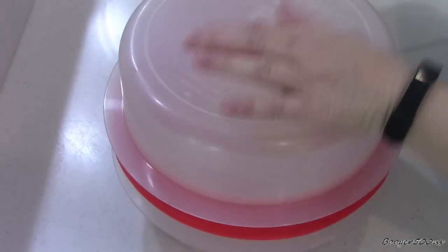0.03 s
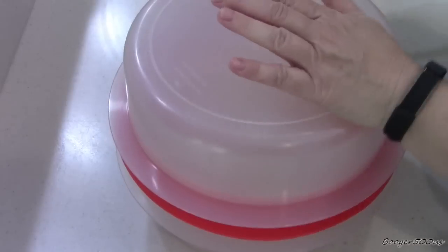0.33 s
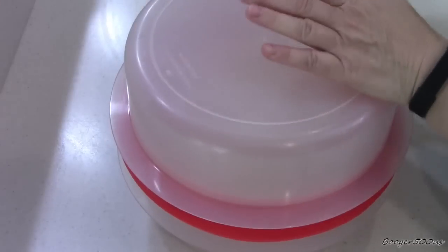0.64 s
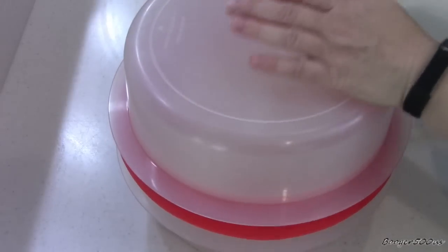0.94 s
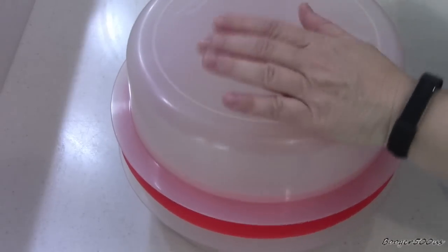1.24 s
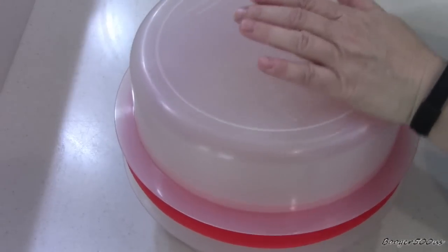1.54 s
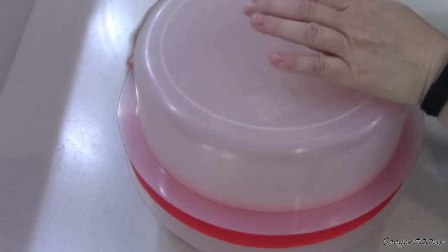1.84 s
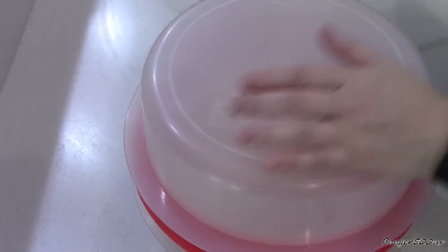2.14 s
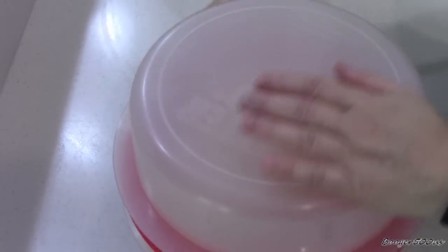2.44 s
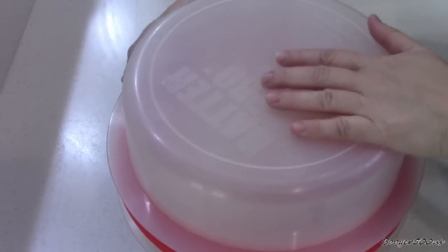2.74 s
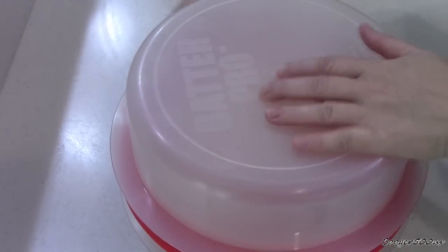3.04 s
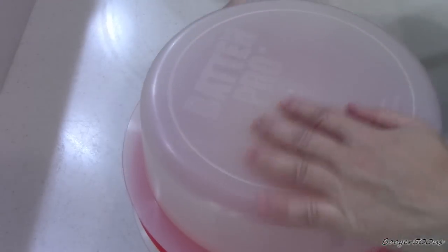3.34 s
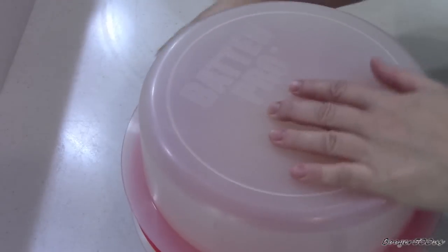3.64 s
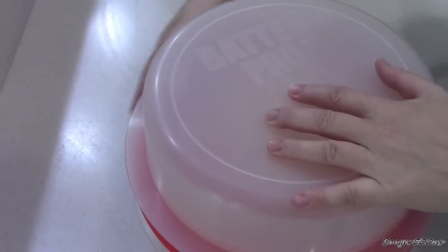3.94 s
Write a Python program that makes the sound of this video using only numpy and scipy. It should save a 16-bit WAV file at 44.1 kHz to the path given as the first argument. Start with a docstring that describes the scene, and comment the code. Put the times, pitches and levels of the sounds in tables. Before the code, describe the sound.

Close up in a small kitchen, dry grains swish in a steady rhythm inside a lidded plastic tub sliding to and fro. Between strokes it thumps on the counter and sometimes clacks, over a low hum.

```python
"""On a kitchen counter, a plastic tub is pushed to and fro, heard up close and in mono.
Its base scrapes and its dry contents swish along the wall with every stroke. At the turns the tub
rocks and knocks, its lid booms, and now and then the rim clacks.
The echo of a small room and a low hum lie behind."""
import sys
import numpy as np
from scipy import signal
from scipy.fft import rfft, irfft
from scipy.io import wavfile
from scipy.ndimage import map_coordinates

SR = 44100
rng = np.random.default_rng(int(sys.argv[2]) if len(sys.argv) > 2 else 0)


def generate_wav(signal):
    """Clip the signal to [-1, 1] and save it as 16-bit WAV at the path in sys.argv[1]."""
    frames = np.transpose(np.atleast_2d(signal))
    scaled = np.clip(frames, -1, 1) * 32767
    pcm = np.round(scaled).astype(np.int16)
    wavfile.write(sys.argv[1], SR, pcm)


N = 176400
T = np.arange(N) / SR  # time in the scene, in seconds
HIT_T = np.arange(SR // 2) / SR  # time since a hit, in seconds


def amp(db):
    """Turns decibels into a number to multiply a sound by."""
    return 10 ** (np.asarray(db) / 20)


def unit(x):
    """Scales a signal to an average power of one."""
    return x / np.sqrt(np.mean(x ** 2) + 1e-20)


def add(mix, start_s, sound):
    """Mixes a sound in at the given time."""
    part = mix[max(round(start_s * SR), 0):][:len(sound)]
    part += sound[:len(part)]


def colour(x, points):
    """Turns frequencies up or down along a curve of points: f/Hz, level/dB."""
    hz, db = np.transpose(points)
    f = np.fft.rfftfreq(len(x), 1 / SR)
    return irfft(rfft(x) * amp(np.interp(np.log(f + 1), np.log(hz), db)), len(x))


def wobble(hz):
    """A random wavering, mostly slower than the given rate."""
    f = np.fft.rfftfreq(N, 1 / SR)
    return unit(irfft(rfft(rng.standard_normal(N)) / (1 + (f / hz) ** 2), N))


def fade(t60):
    """Dies away by 60 dB in t60 seconds."""
    return np.exp(-np.log(1000) * HIT_T / t60)


def hit_shape(t60, attack_s):
    """The strength of a hit: it rises quickly, then dies away."""
    return fade(t60) * (1 - np.exp(-HIT_T / attack_s))


def tone(hz, t60, attack_s):
    """One dying vibration of something struck."""
    return np.sin(2 * np.pi * hz * HIT_T) * hit_shape(t60, attack_s)


def grains(per_second=14000, spread_db=0.5):
    """A dense stream of tiny contacts of uneven size."""
    size = amp(spread_db * np.minimum(rng.exponential(1, N), 5))
    return size * rng.standard_normal(N) * (rng.random(N) < per_second / SR)


def background(noise_db=-32, hum_hz=59.3, hum_db=-40.5):
    """Low room rumble, faint hiss and the hum of mains power."""
    # tone colour of the rumble and hiss: f/Hz, level/dB
    noise_colour = [(15, 5), (30, -3), (62, 0), (150, -10), (250, -18), (600, -22), (1200, -31),
                    (2000, -32.5), (5000, -35.5), (9000, -42.5), (16000, -55)]
    noise = unit(colour(rng.standard_normal(N), noise_colour))
    hum = np.sqrt(2) * np.sin(2 * np.pi * hum_hz * T)
    return amp(noise_db) * noise + amp(hum_db) * hum


def scrape(rise_s=0.018, brake_s=0.15, judder_db=1.75):
    """The tub's base skids: each push starts quickly, keeps its speed and brakes to a stop."""
    # pushes across the counter: start/s, stop/s, level/dB
    pushes = [(-.2, 0.167, -33), (0.184, 0.558, -33), (0.58, 0.982, -32.5), (1.03, 1.406, -32.5),
              (1.441, 1.864, -34.5), (1.872, 2.257, -32), (2.308, 2.745, -30), (2.747, 3.129, -32),
              (3.165, 3.524, -31), (3.577, 3.988, -32.5)]
    # dull tone colour of the base rubbing on the counter: f/Hz, level/dB
    scrape_colour = [(100, 12), (330, -1.5), (620, -2.5), (850, 2.5), (1000, 9), (1150, 3), (1320, 4.5),
                     (1650, 0.5), (1950, 1.5), (2600, -2.5), (3300, 2), (3900, -13), (5300, -8.5),
                     (7000, -20), (16000, -36)]
    level = np.zeros(N)
    for start, stop, db in pushes:
        starting = np.clip((T - start) / rise_s, 0, 1)
        braking = np.clip((stop - T) / brake_s, 0, 1) ** 1.51
        level += amp(db) * starting * braking
    return level * unit(colour(grains(), scrape_colour)) * amp(judder_db * wobble(hz=35))


def contents(trickle_db=-9.5, settle_s=0.049, flutter_db=0.33):
    """Grains slide on the wall: a ringing swish with fizz on top, then a thin trickle as they settle."""
    # long slides and short jolts: fastest moment/s, rise/s, fall/s, level/dB, fizz against level/dB
    slides = [(.005, .05, .064, -29, -5.5), (0.227, 0.012, 0.012, -33.5, -6.5),
              (.403, 0.074, 0.052, -27.5, -6), (0.616, 0.022, 0.01, -33, -7), (0.807, 0.1, .071, -25, -6),
              (1.244, 0.12, 0.058, -25.5, -5.5), (1.485, .02, 0.044, -36.5, -5),
              (1.69, 0.13, 0.034, -27, -6.5), (1.915, 0.02, 0.14, -37, -3), (2.109, 0.13, 0.056, -25, -4.5),
              (2.351, 0.017, .057, -34, -2), (2.507, .11, 0.097, -22.5, -7), (2.94, 0.11, 0.078, -25, -5),
              (3.342, 0.089, 0.099, -22.5, -5), (3.748, 0.071, 0.077, -25.5, -7),
              (3.83, 0.036, 0.036, -27, -6)]
    # tone colours of the sliding grains, their bright fizz and their trickle: f/Hz, level/dB
    swish_colour = [(500, -31.5), (1500, -20), (2000, -7.5), (2750, -7), (3100, 1.5), (3350, 1.5),
                    (3750, -9), (4500, -9.5), (5050, -4.5), (5350, 3), (5750, 1.5), (6300, -4),
                    (7000, -33.5), (16000, -50)]
    fizz_colour = [(3000, -37), (5500, -8.5), (6900, -1.5), (8200, -0.5), (9700, -4), (11200, -13),
                   (12500, -11), (14000, -16), (16000, -25)]
    trickle_colour = [(2500, -7), (3300, 3), (4800, 3), (7500, -8), (16000, -27.5)]
    swish_power, fizz_power = np.zeros((2, N))
    for t, rise, fall, db, fizz_db in slides:
        from_peak = abs(T - t) / np.where(T < t, rise, fall)
        power = (amp(db) * np.exp(-(from_peak / 1.043) ** 2.64)) ** 2  # a round-topped swell
        swish_power += power
        fizz_power += power * amp(fizz_db) ** 2
    lag = np.exp(-1 / (settle_s * SR))  # the trickle trails behind the swish
    trickle_power = amp(trickle_db) ** 2 * signal.lfilter([1 - lag], [1, -lag], swish_power)
    # the swish's pitches wander by about 1.2 % as the heap shifts
    position = np.arange(N) + np.cumsum(0.012 * wobble(hz=5))
    wandering = map_coordinates(colour(grains(), swish_colour), [position], mode="mirror")
    swish = np.sqrt(swish_power) * unit(wandering)
    fizz = np.sqrt(fizz_power) * unit(colour(grains(), fizz_colour))
    trickle = np.sqrt(trickle_power) * unit(colour(grains(), trickle_colour))
    return (swish + fizz + trickle) * amp(flutter_db * wobble(hz=43.7))


def bumps():
    """The rocking tub heaves on the counter with a deep note, its lid booms and its wall thuds."""
    # bumps of the tub: t/s, heave/dB, boom/dB, boom f/Hz, boom fade time/s
    bump_times = [(0.187, 5, -10.5, 107.4, 0.29), (0.22, 0, -0.5, 153, 0.068), (0.261, 0.5, -14, 153, 0.25),
                  (.31, -19, -13, 146, 0.14), (.596, -4, -18.5, 152, 0.37), (.651, -7, -12, 148.8, 0.26),
                  (1.021, -7.5, -12.5, 135, 0.088), (1.047, -8.5, -6.5, 147.6, 0.14),
                  (1.093, -4.5, -7.5, 144, 0.23), (1.264, -38, -21, 147.3, 0.46),
                  (1.439, -9.5, -15.5, 150, 0.067), (1.47, -4, -8, 140, 0.084),
                  (1.523, -10, -15.5, 149, 0.35), (1.577, -8.5, -10.5, 138, 0.095),
                  (1.73, -13, -18.5, 151.4, 0.27), (1.865, -10, -16.5, 155.5, .19),
                  (1.899, -2, -9, 142.5, 0.21), (2.335, -6, -15, 153, 0.24), (2.57, -10, -7.5, 146.5, 0.23),
                  (2.774, -6.5, -13, 169.5, 0.12), (3.014, -17, -10.5, 128, 0.051),
                  (3.094, -13, 3.5, 126, 0.029), (3.114, -4, -4, 132, 0.08),
                  (3.201, -7.5, -15.5, 171, 0.073), (3.528, -0.5, 4, 177, 0.056),
                  (3.553, 4, -14.5, 130, 0.069), (3.818, -23, -12.5, 142.3, 0.095)]
    out = np.zeros(N)
    for t, heave_db, boom_db, hz, t60 in bump_times:
        heave = amp(heave_db) * tone(hz=64.1, t60=0.092, attack_s=0.0081)
        boom = amp(boom_db) * tone(hz, t60, attack_s=0.0019)
        # the wall gives no more under the heaviest bumps, so the thud has a top level
        thud_db = min((heave_db + boom_db) / 2 - 13.5, -16)
        add(out, t, heave + boom + thud(thud_db))
    return out


def thud(db, cutoff_hz=240):
    """The wall's many low vibrations blur into one short, dead thud."""
    low_noise = signal.lfilter(*signal.butter(2, cutoff_hz, fs=SR), rng.standard_normal(len(HIT_T)))
    shape = hit_shape(t60=0.14, attack_s=0.00088)
    burst = low_noise * shape
    return amp(db) * np.linalg.norm(shape) * burst / np.linalg.norm(burst)


def knocks():
    """The wall rings hollow for a few cycles, at a pitch set by the place that is hit."""
    # knocks on the wall: t/s, level/dB, f/Hz
    knock_times = [(.208, -12.5, 870), (.224, -14, 444), (.239, -6.5, 707), (0.26, -6, 364),
                   (.287, -11.5, 660), (0.312, -8.5, 294), (1.055, -12, 520), (1.094, -4, 640),
                   (1.478, -14, 810), (1.523, -5.5, 670), (1.903, -18, 410), (2.389, -9.5, 413),
                   (2.754, -11, 386), (2.867, -13.5, 850), (3.097, -22.5, 440), (3.117, -6.5, 563)]
    # the wall's vibrations: multiple of the knock's pitch, level/dB
    wall_tones = [(.58, -10), (1, -0.5), (1.45, -8.5)]
    out = np.zeros(N)
    for t, db, hz in knock_times:
        for multiple, tone_db in wall_tones:
            add(out, t, amp(db + tone_db) * tone(hz * multiple, t60=0.019, attack_s=0.0017))
    return out


def clacks():
    """Hard plastic meets plastic: a brief snap and the ring of the rim."""
    # clacks of the rim: t/s, ring/dB, snap/dB, favoured f/Hz
    clack_times = [(0.5917, -4.5, -6, 1600), (0.595, -13, -12.5, 1410), (1.029, -15, -7.5, 850),
                   (2.319, -4, -2, 960), (2.329, -5, -7, 910), (3.117, -23, -12.5, 700),
                   (3.595, -6.5, -5, 1070), (3.6, -8, -6.5, 900)]
    # tone colour of the snap: f/Hz, level/dB
    snap_colour = [(200, 10), (1000, -3), (1650, 2.5), (2000, -8), (3200, 1), (4200, -12.5), (6200, -11),
                   (9000, -19), (16000, -46)]
    out = np.zeros(N)
    for t, ring_db, snap_db, hz in clack_times:
        noise = unit(colour(rng.standard_normal(len(HIT_T)), snap_colour))
        snap = noise * hit_shape(t60=0.023, attack_s=0.00034)
        add(out, t, (amp(ring_db) * rim_ring(hz) + amp(snap_db) * snap) / 2)
    return out


def rim_ring(favoured_hz, drop_db_per_octave=7, detune=0.029):
    """The rim rings with several tones; the place that is struck favours those near one pitch."""
    # the rim's vibrations: f/Hz, level/dB, fade time/s
    rim_tones = [(368, 6, 0.042), (724, -10, .03), (870, -3, 0.054), (971, -2.5, 0.054), (1104, -4, 0.024),
                 (1320, -11, 0.043), (1380, -5.5, .035), (1640, -3.5, 0.036), (2400, -3, 0.013)]
    out = np.zeros(len(HIT_T))
    for hz, db, t60 in rim_tones:
        direction, pitch_shift = rng.standard_normal(2)
        level = amp(db - drop_db_per_octave * abs(np.log2(hz / favoured_hz)))
        out += np.sign(direction) * level * tone(hz * (1 + detune * pitch_shift), t60, attack_s=0.00014)
    return out


def room(x, build_up_s=0.015):
    """The kitchen's short echo, with a bright part that lingers a little longer."""
    noise = rng.standard_normal(len(HIT_T))
    broad = colour(noise, [(60, 0), (250, 5.0), (2500, 6.0), (8000, 6.5)]) * fade(t60=0.61)
    bright = colour(noise, [(1500, -43), (3000, 3), (6000, -1), (16000, -26)]) * fade(t60=0.81)
    echo = (broad + bright) * np.clip(HIT_T / build_up_s, 0, 1) ** 2
    return signal.fftconvolve(x, echo / np.linalg.norm(echo))[:N]


def scene():
    """The tub in its room, the same in both channels."""
    rubs = contents() + scrape()
    hits = bumps() + knocks()
    rim = clacks()
    echo = room(amp(-14) * rubs + amp(-9.5) * hits + amp(-7.5) * rim)
    mono = rubs + hits + rim + echo + background()
    return np.array([mono, mono])


def record(dry):
    """Trims away the deepest rumble (below 12 Hz) and the highest treble (above 15950 Hz)."""
    trimmed = signal.lfilter(*signal.butter(1, 12, "high", fs=SR), dry)
    treble_cut = signal.firwin(1023, 15950, window=("kaiser", 9), fs=SR)
    return signal.oaconvolve(trimmed, treble_cut[None], "same")


dry = scene()
out = record(dry)
generate_wav(out)
```